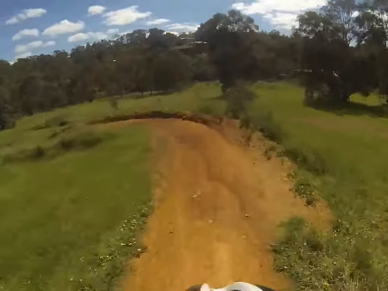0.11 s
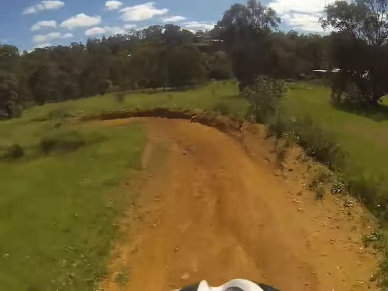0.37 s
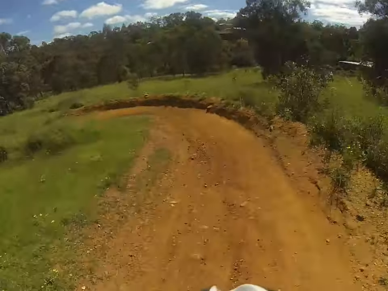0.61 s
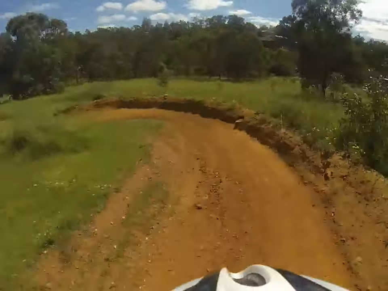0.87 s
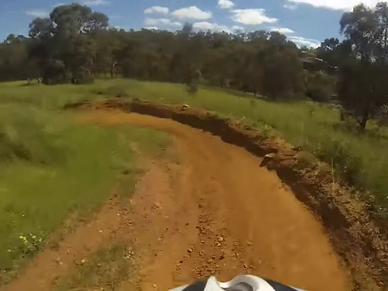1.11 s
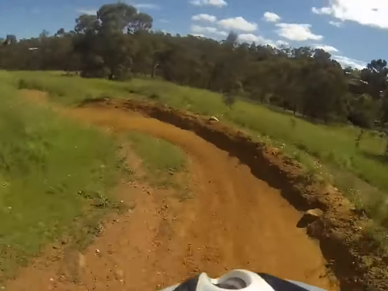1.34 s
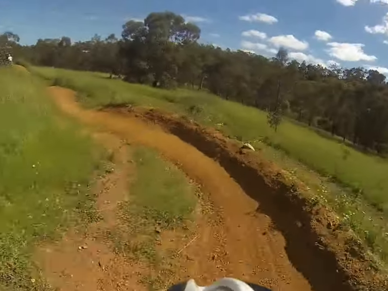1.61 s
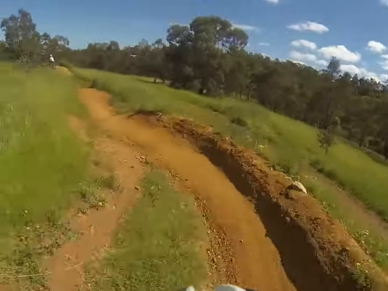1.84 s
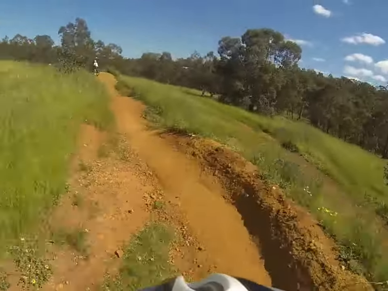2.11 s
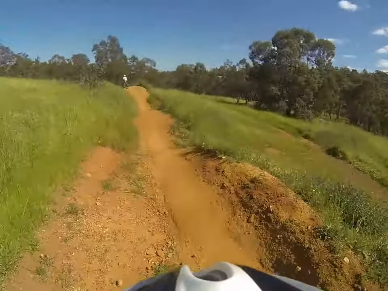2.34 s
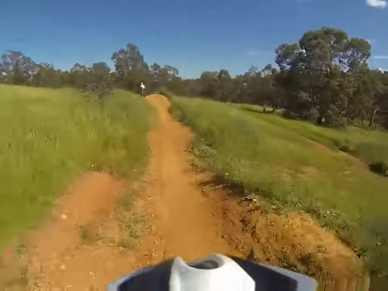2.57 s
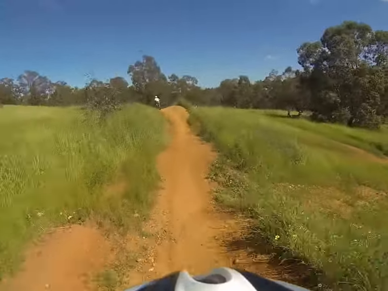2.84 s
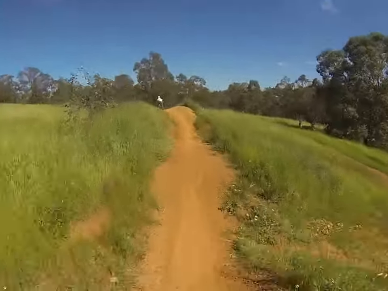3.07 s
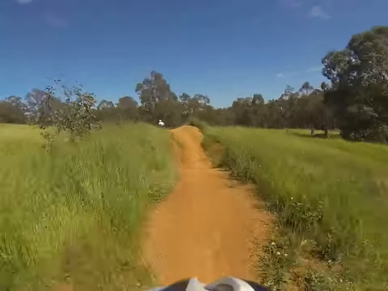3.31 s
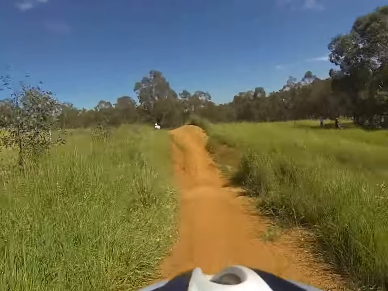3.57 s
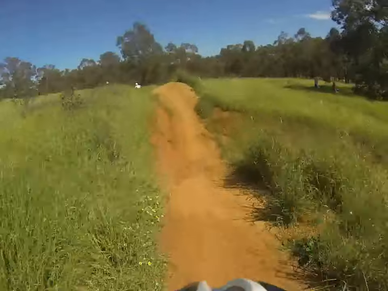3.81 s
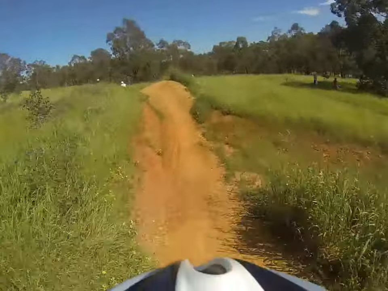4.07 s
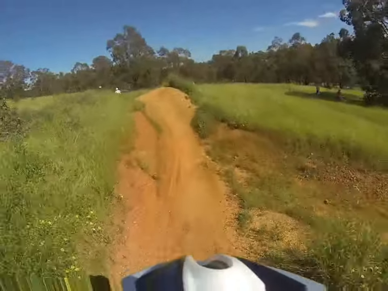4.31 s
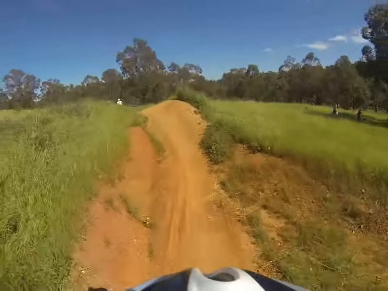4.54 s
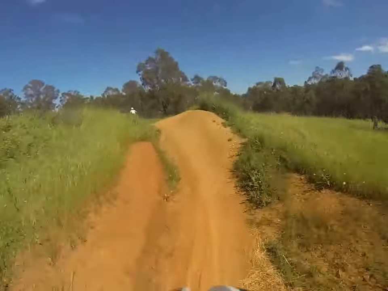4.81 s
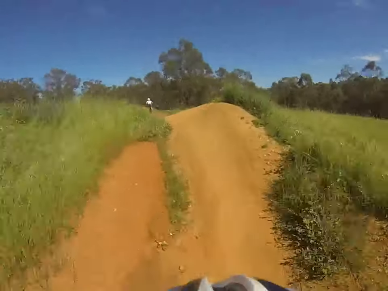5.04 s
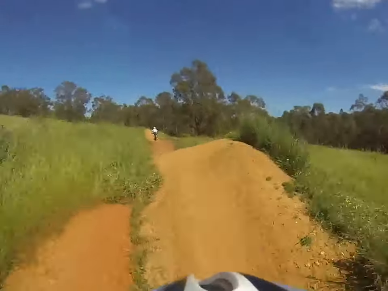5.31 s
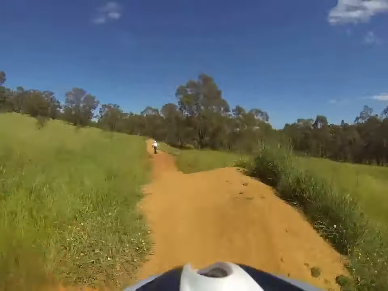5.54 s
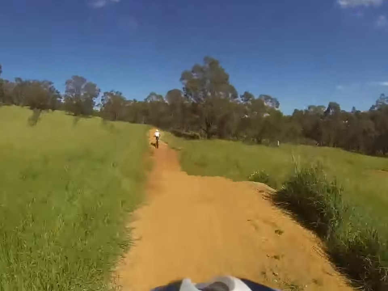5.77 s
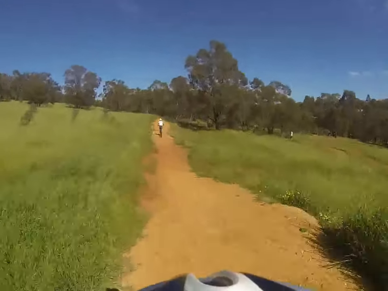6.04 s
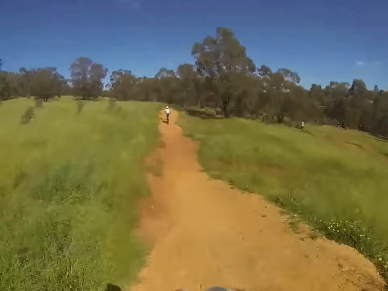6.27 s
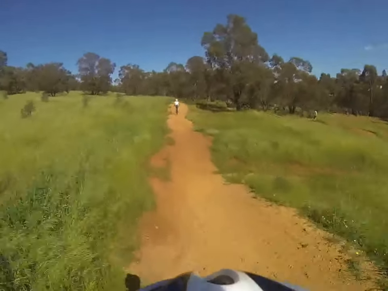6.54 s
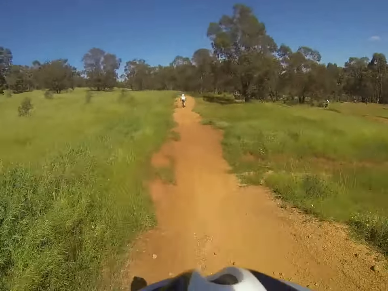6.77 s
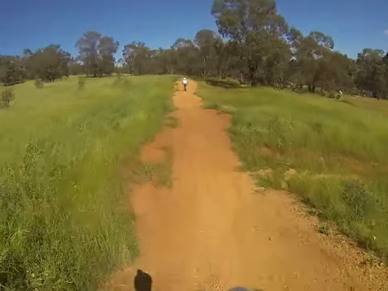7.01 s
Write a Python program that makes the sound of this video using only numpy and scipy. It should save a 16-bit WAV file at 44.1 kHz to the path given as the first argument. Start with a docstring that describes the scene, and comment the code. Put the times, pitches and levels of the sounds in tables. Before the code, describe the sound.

Rapid hollow plastic clacks and overloaded bassy thumps from a bike ride on rough ground, easing briefly near two seconds, then returning over rumbling wind.

```python
"""Bumpy dirt trail, microphone in a camera's plastic case on a cyclist's helmet, about 7 s.
From the start jolts come thick: the shell rings, trapped air is pushed and the mount sways; light taps between.
Near 2 s the jolts pause and faint chirps come from the trees, far off; from 2.5 s the jolts return to the end.
A loose part snaps at 0.6 s and from 3.1 to 5.7 s; the case bounces on its clip near 3 and 5 s; more chirps
come after 4.2 s. Throughout, shaped noise gives wind on the port, close rustle and a faint flickering hiss."""
import sys
import numpy as np
from scipy import signal
from scipy.fft import rfft, irfft, next_fast_len
from scipy.io import wavfile
from scipy.ndimage import uniform_filter1d

SR = 44100
rng = np.random.default_rng(int(sys.argv[2]) if len(sys.argv) > 2 else 0)


def wav_record(signal):
    """Record a signal, one row per channel, as 16-bit PCM in the file named by sys.argv[1]."""
    frames = np.transpose(np.atleast_2d(signal))
    bounded = np.clip(frames, -1, 1)
    # unit amplitude maps onto the largest positive 16-bit level
    quanta = np.round(bounded * 32767).astype(np.int16)
    wavfile.write(sys.argv[1], SR, quanta)


def gain_from_decibels(decibels):
    """Convert decibel values to linear amplitude factors."""
    exponent = np.asarray(decibels, float) / 20
    return 10 ** exponent


N = 314874

# jolts of the case, push and sway signed by direction, before the input overloads:
# t/s, nominal click level/dB, brightness above 2500 Hz/dB, air push/full scale, sway drive/full scale
JOLTS = [(0.021, -23.5, -13.5, 0.23, 0.096), (0.206, -5.5, -42, 1.38, 0.18),
         (0.3895, -13.5, -13.5, 0.39, 0.31), (0.4187, -32, -20, -0.098, -0.19),
         (0.4752, -9.5, -3, 1.59, 0.064), (0.5844, -29.5, -18, -0.23, 0.22), (0.6963, -7, -6, 1.6, 0.16),
         (0.8975, -5, -3.5, 1.61, 0.13), (0.9911, -21, -13, -0.0084, -0.13),
         (1.207, -34, -43, -0.099, -0.068), (1.232, -8.5, -10.5, 0.96, 0.15),
         (1.3623, -11.5, -7, 0.8, 0.32), (1.5084, -30, -22, 0.01, 0.14), (1.668, -10, -7, 1.14, 0.2),
         (1.7748, -20.5, -12, -0.051, -0.08), (1.8534, -14, -7, 0.57, 0.3), (2.5142, -16, -40, 0.021, 0.12),
         (2.541, -30, -30, 0.034, -0.14), (2.6042, -23.5, -44, -0.16, 0.05),
         (2.6394, -22.5, -24, 0.23, 0.19), (2.7061, -11, -15, 0.74, 0.51),
         (2.9627, -15.5, -11, -0.1, 0.083), (3.1258, -9.5, -16.5, 0.68, 0.78),
         (3.199, -29.5, -32, -0.065, -0.13), (3.346, -16.5, -32, -0.1, -0.27),
         (3.609, -13, -47, -0.15, -0.44), (3.6382, -21.5, -37, 0.014, 0.41),
         (3.651, -17.5, -14, -0.48, 0.039), (3.82, -10, -12.5, 1.04, 0.32), (3.9, -42, -11, -0.12, 0.14),
         (3.9884, -9.5, -10, 1.04, 0.25), (4.311, -29.5, -18, 0.032, 0.17),
         (4.4897, -16.5, -16.5, 0.28, 0.53), (4.531, -22.5, -23, 0.06, 0.065),
         (4.7375, -6, -10.5, 1.52, 0.14), (4.9235, -10, -10.5, 1.26, 0.19),
         (5.0193, -15, -24, -0.033, -0.17), (5.1577, -6.5, -2, 1.65, 0.18),
         (5.3969, -27.5, -14.5, 0.043, 0.2), (5.6764, -13.5, -16.5, 0.6, 0.77),
         (6.019, -51, -32, -0.04, 0.01), (6.0668, -13, -16.5, 0.45, 0.87),
         (6.2152, -28.5, -55, -0.029, 0.041), (6.25, -28.5, -30, 0.018, -0.38),
         (6.3855, -9, -5, 1.19, 0.19), (6.769, -12, -6, 1.12, 0.18), (6.885, -19, -44, -0.09, -0.052),
         (7.042, -8, -4.5, 1.68, -0.053)]
# light taps on the shell that barely move the air: t/s, nominal click level/dB
LIGHT_TAPS = [(0.176, -33.5), (0.2763, -37.5), (0.3361, -27), (0.5573, -31.5), (0.682, -24),
              (0.7512, -25.5), (0.874, -33), (1.0185, -36.5), (1.0427, -32), (1.1384, -30), (1.2918, -42),
              (1.338, -39.5), (1.377, -32), (1.387, -28), (1.404, -40), (1.418, -41), (1.587, -31.5),
              (1.732, -37), (2.0418, -38), (2.1066, -40.5), (2.4218, -25.5), (2.441, -35.5),
              (2.9669, -22.5), (3.271, -42.5), (3.4687, -36), (3.48, -24.5), (3.594, -37), (3.869, -28),
              (4.0132, -27.5), (4.039, -42), (4.185, -42), (4.2039, -35.5), (4.424, -41), (4.5692, -31),
              (4.645, -33.5), (4.714, -32), (4.8134, -30.5), (4.8641, -30), (4.911, -37.5), (4.999, -40),
              (5.037, -36), (5.047, -28.5), (5.1485, -27.5), (5.2092, -24), (5.2859, -30.5), (5.4147, -37),
              (5.551, -36.5), (5.6964, -29), (5.789, -40), (5.906, -42), (6.185, -50), (6.3573, -31.5),
              (6.441, -44.5), (6.527, -29), (6.5758, -33), (7.114, -31)]
# modes of the case shell before each contact varies them: f/Hz, level/dB, t60/s
SHELL_MODES = [(321, -3, 0.032), (627, -17.5, 0.019), (970, 5.5, 0.01), (1158.5, 9.5, 0.012),
               (1544, 3.5, 0.014), (1822, 8, 0.0062), (2740, 10.5, 0.004), (3270, -3.5, 0.013),
               (4540, -8.5, 0.0044), (5750, -10, 0.0035), (6300, -16.5, 0.0099), (8200, -28.5, 0.0046),
               (12720, -25.5, 0.0087)]

DAMPING_PER_PUSH = 0.5  # an upward jolt clamps the case and shortens its ring
OVERLOAD = 1.093  # input limit, full scale
CALM_RUSTLE_DB = -61.5


def evened(x):
    """Scales to rms 1."""
    return x / np.sqrt(np.mean(x ** 2) + 1e-20)


def add(mix, s, sound):
    """Mixes a sound in at time s."""
    part = mix[max(round(s * SR), 0):][:len(sound)]
    part += sound[:len(part)]


def flicker(seconds):
    """Random wander of rms 1 that changes over the given time."""
    span = max(round(seconds * SR), 1)
    smooth = uniform_filter1d(rng.standard_normal(N), span)
    return evened(uniform_filter1d(smooth, span))


def coloured(points):
    """Noise of rms 1 with the given spectrum, interpolated over log frequency."""
    size = next_fast_len(N)
    f, db = np.transpose(points)
    log_f = np.log(np.fft.rfftfreq(size, 1 / SR) + 1)
    gain = gain_from_decibels(np.interp(log_f, np.log(f + 1), db))
    return evened(irfft(rfft(rng.standard_normal(size)) * gain, size)[:N])


def shell(bright_db, luck, pushed=0):
    """One ring of the shell after a soft contact; where it is struck shifts each mode a little."""
    dull_hz, bright_hz = 1350, 2500  # brightness takes hold between these
    spread_db, detune = 2.8, 0.036  # standard deviations of mode level and relative frequency
    down_lean_db = -4  # per octave above dull_hz, up to one octave: a downward jolt favours the low modes
    rise_cycles = 0.33
    hz, db, t60 = np.transpose(SHELL_MODES)[:, :, None]
    t = np.arange(1500) / SR
    brightness = np.clip((hz - dull_hz) / (bright_hz - dull_hz), 0, 1)
    db = db + bright_db * brightness + spread_db * luck[0][:, None]
    db = db + (pushed < 0) * down_lean_db * np.log2(np.minimum(hz / dull_hz, 2))
    t60 = t60 / (1 + DAMPING_PER_PUSH * max(pushed, 0))
    struck_hz = hz * (1 + detune * luck[1][:, None])
    modes = gain_from_decibels(db - 60 * t / t60) * np.sin(2 * np.pi * struck_hz * t)
    onset = (1 - np.exp(-t * hz / rise_cycles)) ** 2
    return (modes * onset).sum(0)


def clicks():
    """A touch and the full blow ring the shell; dull rebounds follow, longer while the mount sways."""
    tap_bright_db = -19.5
    drop_back_s, drop_back_db = 0.0115, -23  # the case drops back once after a hard upward jolt
    rattle_t60, rattle_t60_per_sway = 0.028, 0.03  # s, before upward damping
    rattle_db = -26.5
    out = np.zeros(N)
    t = np.arange(2600) / SR
    contacts = JOLTS + [(*tap, tap_bright_db, 0, 0) for tap in LIGHT_TAPS]
    for s, db, bright_db, pushed, sway in contacts:
        spot = rng.standard_normal((2, len(SHELL_MODES)))
        ring = shell(bright_db, spot, pushed)
        gain = gain_from_decibels(db) / np.sqrt(np.mean(ring[:66] ** 2))  # nominal level is the rms of the first 1.5 ms
        add(out, s, 0.39 * gain * ring)
        add(out, s + 0.000626, 0.66 * gain * ring)
        if pushed > 0.5:
            add(out, s + drop_back_s, gain_from_decibels(drop_back_db) * gain * shell(bright_db, spot[::-1]))
        # sparse random contacts, dying away
        damping = 1 + DAMPING_PER_PUSH * max(pushed, 0)
        fade_db = -60 * t * damping / (rattle_t60 + rattle_t60_per_sway * abs(sway))
        grains = rng.standard_normal(len(t))
        rebounds = (abs(grains) > 2.7) * grains * gain_from_decibels(rattle_db + fade_db)
        dull_ring = shell((bright_db + tap_bright_db) / 2, spot[::-1], pushed)
        add(out, s + 0.00152, gain * signal.fftconvolve(rebounds, dull_ring))
    return out


def thumps():
    """A short push of air at each jolt or tap, the mount swaying after a jolt, the case bouncing."""
    push_s, push_lag_s = 0.0041, 0.00032
    sway_hz, sway_t60 = 45.3, 0.22
    bounce_hz, bounce_t60 = 132, 0.061
    tap_push_db = 5  # peak of a tap's air push over its nominal click level
    # the case bounces on its clip after some downward jolts: t/s, starting size/full scale
    clip_bounces = [(2.9669, 0.8), (5.021, 0.31)]
    t = np.arange(SR // 2) / SR
    push = np.sin(np.pi * np.minimum(t / push_s, 1) ** 0.78) ** 2  # rises faster than it falls
    swing = gain_from_decibels(-60 * t / sway_t60) * np.cos(2 * np.pi * sway_hz * t)
    sway = signal.fftconvolve(push, swing)[:len(t)] / push.sum()
    bounce = gain_from_decibels(-60 * t / bounce_t60) * np.sin(2 * np.pi * bounce_hz * t)
    out = np.zeros(N)
    for s, _, _, pushed, swayed in JOLTS:
        add(out, s + push_lag_s, pushed * push + swayed * sway)
    for s, size in clip_bounces:
        add(out, s, -size * bounce)
    ways = rng.choice([-1, 1], len(LIGHT_TAPS))
    for (s, db), way in zip(LIGHT_TAPS, ways):
        add(out, s + push_lag_s, way * gain_from_decibels(db + tap_push_db) * push)
    return out


def snaps():
    """Thin dry snaps of a loose part inside the case: about one cycle, with no ring."""
    snap_hz, decay_s = 4200, 0.0002
    # snaps of the loose part: t/s, peak level/dB
    loose_part = [(0.612, -43), (3.137, -32), (3.269, -44), (4.203, -45), (5.046, -43), (5.223, -50),
                  (5.687, -32.5), (5.7027, -38.5)]
    t = np.arange(100) / SR
    snap = np.exp(-t / decay_s) * np.sin(2 * np.pi * snap_hz * t)
    out = np.zeros(N)
    for s, db in loose_part:
        add(out, s, gain_from_decibels(db) * snap / snap.max())
    return out


def gusts(column, calm_db):
    """Gain over time: each gust climbs, holds and dies away over the calm level, adding in power."""
    rise_db_per_s, fall_db_per_s = 352.5, 449.5
    # gusts that buffet the port and make the case rustle:
    # start t/s, length/s, buffet gain level/dB, rustle gain level/dB
    gust_rows = [(0.036, 0.037, -18, -47.5), (0.06, 0.15, -25.5, -50.5), (0.306, 0.055, -19.5, -51),
                 (0.402, 0.05, -22.5, -44), (0.584, 0.015, -10, -42), (0.648, 0.023, -22, -46),
                 (0.762, 0.028, -17.5, -48), (0.863, 0.054, -20.5, -46), (0.98, 0.13, -33, -53),
                 (1.136, 0.1, -18, -47.5), (1.314, 0.13, -27, -59.5), (1.514, 0.14, -22.5, -56),
                 (1.73, 0.18, -31, -59.5), (2.035, 0.21, -23, -64), (2.357, 0.2, -14.5, -62),
                 (2.43, 0.21, -22, -47.5), (2.595, 0.22, -20, -49.5), (2.864, 0.17, -18.5, -47.5),
                 (2.932, 0.17, -31, -43), (3.123, 0.84, -25, -52.5), (3.476, 0.056, -16, -43),
                 (3.623, 0.039, -8.5, -36.5), (3.758, 0.32, -26.5, -60.5), (4.19, 0.37, -31.5, -60),
                 (4.524, 0.075, -17.5, -50.5), (4.642, 0.082, -20.5, -45), (5.02, 0.047, -15, -48),
                 (5.114, 0.073, -26, -51.5), (5.2, 0.12, -23, -57.5), (5.416, 0.033, -25, -53.5),
                 (5.551, 0.21, -30.5, -71.5), (6.214, 0.019, -22, -47), (6.245, 0.014, -6.5, -38),
                 (6.328, 0.058, -41, -47.5), (6.523, 0.11, -30, -59.5), (6.755, 0.024, -28.5, -55),
                 (6.922, 0.0096, -9.5, -46), (6.963, 0.077, -16, -54), (7.124, 0.05, -25, -53)]
    t = np.arange(N) / SR
    power = gain_from_decibels(calm_db) ** 2 * np.ones(N)
    for row in gust_rows:
        start, length = row[:2]
        early = np.maximum(start - t, 0)
        late = np.maximum(t - start - length, 0)
        power = power + gain_from_decibels(row[column] - rise_db_per_s * early - fall_db_per_s * late) ** 2
    return np.sqrt(power)


def wind():
    """Lumpy low pressure noise on the microphone port, swelling with the gusts."""
    calm_buffet_db, lumpy_db = -36.5, 6  # lumps stay within +-lumpy_db before evening
    # relative spectrum of the buffeting: f/Hz, level/dB per Hz
    buffet_spectrum = [(10, -10.5), (18, 16.5), (35, -9.5), (90, -15), (200, -33), (400, -45.5),
                       (800, -71.5), (3000, -130)]
    lumps = gain_from_decibels(lumpy_db * np.tanh(flicker(0.014)))
    return gusts(column=2, calm_db=calm_buffet_db) * evened(coloured(buffet_spectrum) * lumps)


def seated():
    """Gain on the rustle: an upward jolt seats the case, so the rustle drops and creeps back."""
    drop_db_per_push, recovery_s = -6.5, 0.072
    drop_db = np.zeros(N)
    t = np.arange(0, 4 * recovery_s, 1 / SR)
    for s, _, _, pushed, _ in JOLTS:
        depth_db = drop_db_per_push * np.clip(pushed, 0, OVERLOAD)
        add(drop_db, s, depth_db * np.exp(-(t / recovery_s) ** 2))
    return gain_from_decibels(drop_db)


def rustle():
    """Rubbing noise comes in clumps, and small loose grains ring the shell with it."""
    ticks_per_s, ticks_db, clumpy_db = 500, -6, 2.2  # ticks_db is relative to the rubbing
    # relative spectrum of the rubbing: f/Hz, level/dB per Hz
    rub_spectrum = [(180, -2.5), (255, -0.5), (325, 1), (400, -2.5), (535, -18), (635, -1.5), (760, -17.5),
                    (1000, -7), (1230, -6), (1420, -14), (1580, -5), (2200, -20), (3400, -26),
                    (4200, -29.5), (5400, -41.5), (8000, -44.5), (15000, -55.5)]
    clumps = gain_from_decibels(clumpy_db * flicker(0.012))
    rub = coloured(rub_spectrum)
    struck = rng.random(N) < ticks_per_s / SR
    size = gain_from_decibels(5.4 * np.minimum(rng.exponential(1, N), 4)) * struck * clumps
    spot = rng.integers(0, 8, N)  # each grain strikes one of eight places
    luck = rng.standard_normal((8, 2, len(SHELL_MODES)))
    ticks = np.zeros(N)
    for k in range(8):
        ticks += signal.oaconvolve(size * (spot == k), shell(-20.5, luck[k]))[:N]
    level = gusts(column=3, calm_db=CALM_RUSTLE_DB) * seated()
    return level * (evened(rub * clumps) + gain_from_decibels(ticks_db) * evened(ticks))


def hiss():
    """A faint high hiss with two whines near 5 and 10 kHz; it flickers, lifting a little with each gust."""
    calm_db, flicker_db = -72.5, 4
    follows = 0.36  # share of the rustle gain's rise in dB
    # relative spectrum of the hiss and its whines: f/Hz, level/dB per Hz
    hiss_spectrum = [(1200, -12), (2500, -17), (5040, -30), (5080, -13.5), (5120, -29.5), (10060, -31),
                     (10200, -15), (10340, -28.5), (15500, -32)]
    rise = gusts(column=3, calm_db=CALM_RUSTLE_DB) / gain_from_decibels(CALM_RUSTLE_DB)
    level = gain_from_decibels(calm_db + flicker_db * flicker(0.017)) * rise ** follows
    return level * coloured(hiss_spectrum)


def chirps():
    """Faint, narrow notes from far off, made slightly fuzzy by slow noise on their level."""
    # notes from the trees: t/s, length/s, f/Hz, fuzz width/Hz, rms level before the fades/dB
    notes = [(2.005, .05, 2850, 40, -68), (2.11, .06, 2570, 25, -72), (2.2, .065, 2560, 25, -72),
             (2.325, .07, 2560, 25, -72), (6.163, .01, 3600, 300, -56), (4.25, .045, 8450, 300, -65),
             (5.2, .16, 8450, 300, -70)]
    out = np.zeros(N)
    for s, length, hz, width, db in notes:
        t = np.arange(round(length * SR)) / SR
        pole = np.exp(-np.pi * width / SR)
        wander = signal.lfilter([1], [1, -pole], rng.standard_normal(8000))[:len(t)]
        note = (1 + 0.27 * wander) * np.sin(2 * np.pi * hz * t)
        add(out, s, gain_from_decibels(db) * evened(note) * np.sqrt(np.hanning(len(t))))
    return out


def scene():
    """Everything that reaches the microphone inside the case, in one channel."""
    near = clicks() + thumps() + snaps()
    return (near + wind() + rustle() + hiss() + chirps())[None]


def band_limit(x):
    """A steep low-pass at the top of the band."""
    return signal.sosfilt(signal.butter(12, 16085, fs=SR, output="sos"), x)


def record(dry):
    """The input overloads on the hardest jolts; the band limits follow, the bass cut tilting the flat tops."""
    bass_cut_hz, treble_cut_hz = 20.5, 7000
    band = signal.butter(2, [bass_cut_hz, treble_cut_hz], "band", fs=SR, output="sos")
    clipped = np.clip(dry, -OVERLOAD, OVERLOAD)
    mix = signal.sosfilt(band, clipped)
    return band_limit(mix)


dry = scene()
out = record(dry)
wav_record(out)
```